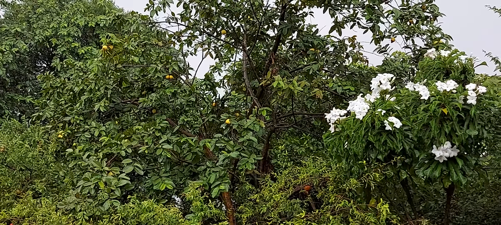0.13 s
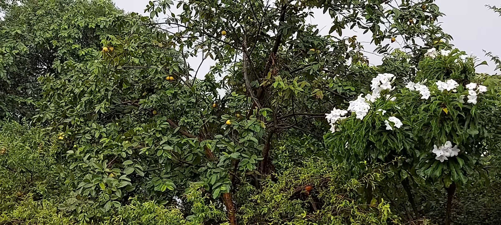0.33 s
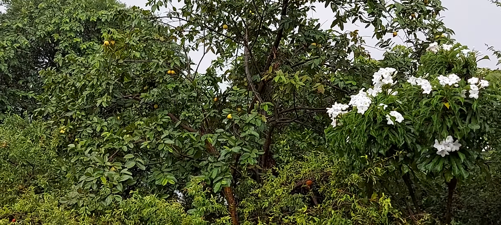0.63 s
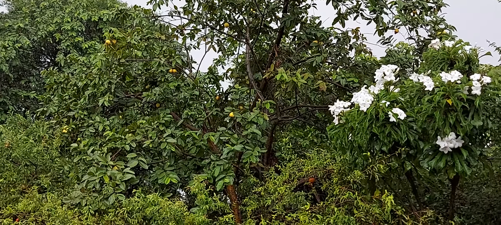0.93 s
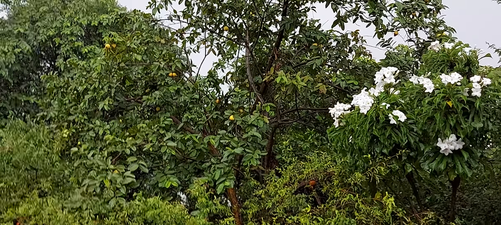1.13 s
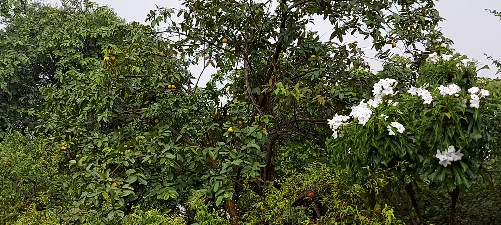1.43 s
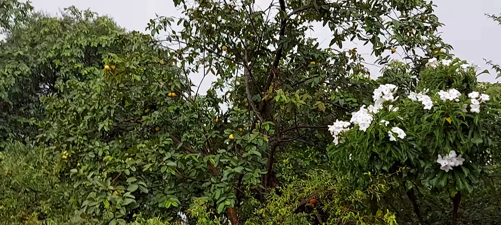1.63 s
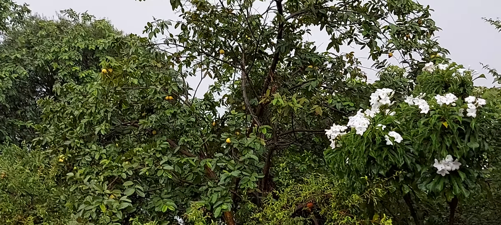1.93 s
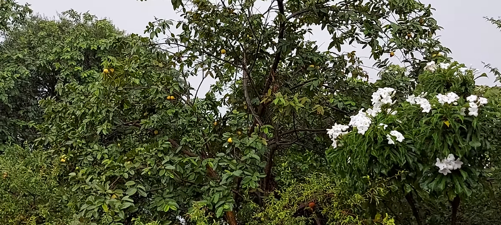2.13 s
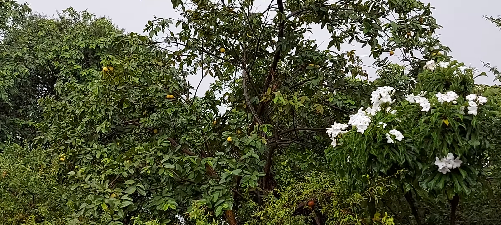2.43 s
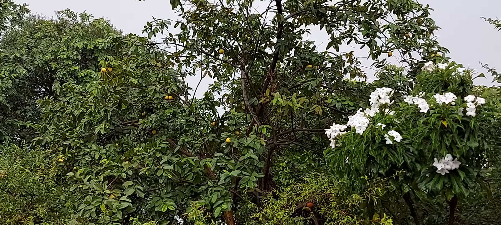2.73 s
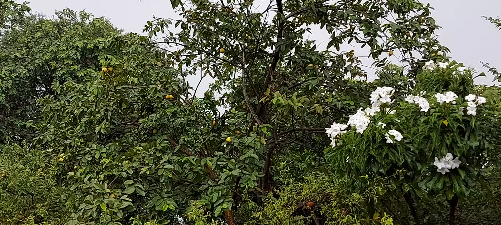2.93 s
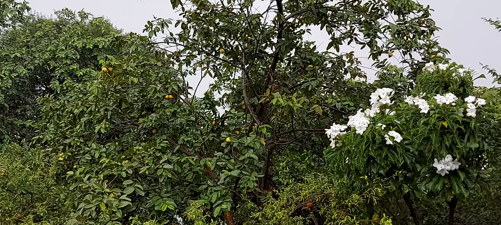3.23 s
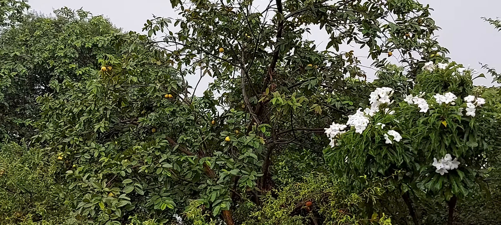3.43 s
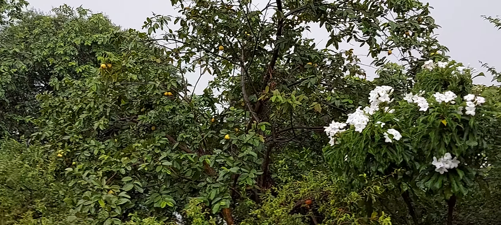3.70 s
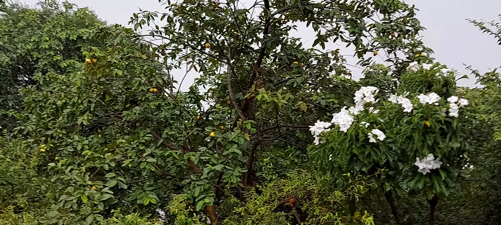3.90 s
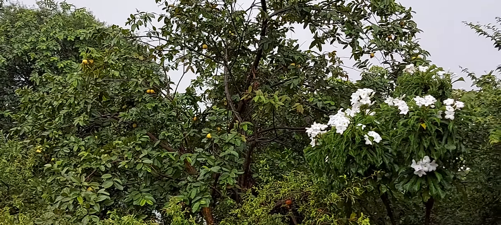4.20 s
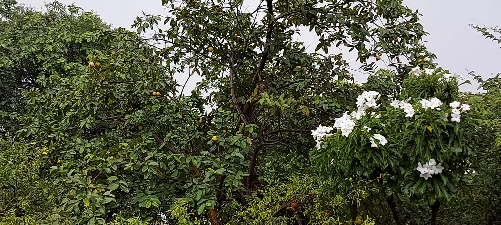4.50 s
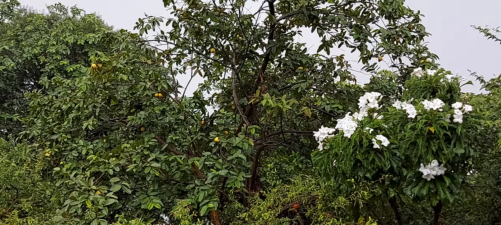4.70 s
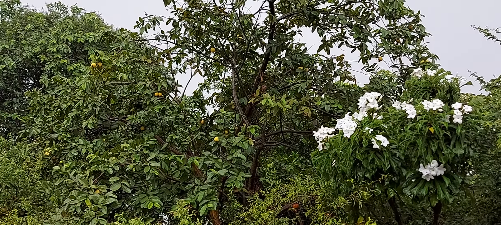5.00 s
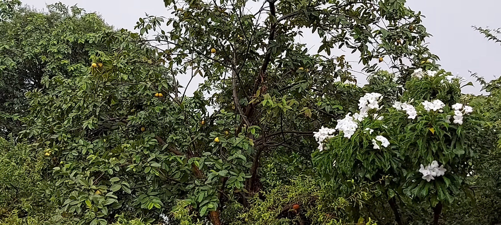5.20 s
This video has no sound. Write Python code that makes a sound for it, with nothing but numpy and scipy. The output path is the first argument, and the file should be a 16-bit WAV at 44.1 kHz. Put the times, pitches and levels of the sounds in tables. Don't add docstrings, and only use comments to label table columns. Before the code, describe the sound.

A muffled, rough-edged thunder roll opens with overlapping thumps, then subsides around three seconds and grumbles softly to the end. Wide stereo rain hiss surrounds it, recessed while the thunder is loud. Bright ticks of near drops lean slightly left, with a small cluster after four seconds. A thin distant bird and blurred insects are barely audible in the wet garden.

```python
import sys
import numpy as np
from scipy import signal
from scipy.fft import rfft, irfft, next_fast_len
from scipy.io import wavfile
from scipy.ndimage import uniform_filter1d

SR = 44100
rng = np.random.default_rng(int(sys.argv[2]) if len(sys.argv) > 2 else 0)


def unload_audio(sound):
    columns = np.transpose(np.atleast_2d(sound))
    steps = np.round(np.clip(columns, -1, 1) * 32767)
    wavfile.write(sys.argv[1], SR, steps.astype(np.int16))


def convert_level_to_amplitude(level_db):
    exponent = np.asarray(level_db, float) / 20
    return 10 ** exponent


N = 236012
TIME_S = np.arange(N) / SR
PADDED = next_fast_len(N + 8192)
HZ = np.maximum(np.arange(PADDED // 2 + 1) * SR / PADDED, 1)

# time_s, level_db
THUNDER_ROLL = [(0.0, -24.5), (0.28, -28), (0.45, -19.5), (0.75, -22), (0.95, -27), (1.5, -22),
                (1.9, -21.5), (2.35, -28), (2.9, -29.5), (3.1, -34), (3.5, -33.5), (3.9, -31.7),
                (4.35, -28.5), (4.85, -33.0), (4.97, -27.5), (5.35, -30)]
# pitch_hz, level_db (per Hz)
THUNDER_COLOUR = [(20, -32), (28, -41), (40, -12.5), (52, -1.5), (91, 2), (134, -1.5), (167, -0.5),
                  (211, -7), (358, -15), (440, -21.5), (548, -24.5), (683, -29.5), (779, -40),
                  (1100, -41.5)]
REGISTER_EDGES = (90, 220, 420)
# centre_hz, offset_db, share of the roll's swing (ratio)
THUNDER_REGISTERS = [
    (60, -7, 1.18),
    (140, -0.9, 1.19),
    (300, -5, 0.97),
    (583, -13, 0.56),
]
# middle_s, lift_db, pitch_hz, length_s
THUNDER_CLAPS = [(0.231, 9, 60, 0.11), (0.354, 13, 60, 0.081), (0.383, 8, 200, 0.032),
                 (0.514, 8, 200, 0.053), (0.613, 9.5, 185, 0.057), (0.694, 10, 60, 0.051),
                 (0.74, 15.5, 140, 0.038), (0.79, -3, 60, 0.028), (0.84, 12, 90, 0.044),
                 (0.888, 12, 140, 0.024), (0.953, 4.5, 200, 0.053), (1.01, 11, 60, 0.04),
                 (1.07, 5, 300, 0.37), (1.14, 8, 60, 0.09), (1.204, 2.5, 200, 0.032),
                 (1.3, 10.5, 89, 0.049), (1.464, 8, 60, 0.045), (1.76, 3.5, 60, 0.082),
                 (1.87, 7.5, 60, 0.045), (2.03, 4, 60, 0.09), (2.47, 4, 60, 0.04), (2.68, 6.0, 300, 0.029),
                 (2.724, 2, 60, 0.09), (2.912, 8, 200, 0.029), (3.607, 12, 60, 0.043),
                 (3.86, 6.9, 60, 0.032), (4.52, 5.5, 60, 0.27), (4.95, 11, 60, 0.06),
                 (5.086, 11, 60, 0.058), (5.278, 6.5, 60, 0.16)]
# time_s, tilt_db (per octave)
CHANNEL_NEARNESS = [(0, -0.8), (.45, 1.6), (.8, 0.3), (1.3, -0.7), (1.9, 0), (2.6, .5), (3.3, -0.3),
                    (3.9, 1), (4.6, -0.24), (5.35, .1)]
# pitch_hz, width_hz, peak_db
PORCH_RESONANCES = [(117, 10.5, 4), (168, 123, 2.5), (249, 4.9, 1.5), (309, 68, 4.5), (364.4, 4.1, 4),
                    (532, 30, 4.5), (630, 19, 2)]
# time_s, level_db
RAIN_LEVEL = [(0, -41.5), (.25, -42.5), (.51, -45), (.65, -48.5), (1.61, -49), (1.97, -48.5), (2.2, -47),
              (2.6, -47), (3.11, -46.5), (4.29, -42), (4.7, -42), (5.35, -41.5)]
# pitch_hz, level_db (per Hz)
RAIN_COLOUR = [(290, -65), (500, 2), (522, -6), (648, -8), (769, -8), (1030, -11), (1430, -9.5),
               (1650, -11.5), (1800, -11.5), (2330, -15.5), (4310, -15), (4770, -17), (7130, -20.5),
               (11600, -20.5), (15500, -28.5)]
# pitch_hz, width_hz, peak_db
HOUSING_RESONANCE = (1795, 130, 5.1)
# start_s, peak_db, centre_hz, thud_db (thud relative to peak)
NEAR_DROPS = [(0.1261, -26, 12000, -17), (0.374, -28, 11300, -18), (0.615, -37, 9720, -16),
              (0.83, -39, 11300, -16), (0.9792, -39, 10100, -13), (1.1802, -39, 8070, -14),
              (1.2321, -37, 11200, -17), (1.7629, -37, 9260, -17), (1.9684, -40, 8730, -13),
              (2.0752, -33, 9190, -18), (2.1316, -32, 11000, -16), (2.2154, -36, 11500, -15),
              (2.2324, -36, 8690, -15), (2.2702, -24, 13500, -27), (2.5122, -33, 8920, -20),
              (2.5534, -37, 8810, -17), (2.5654, -37, 13000, -15), (2.9193, -36, 11700, -17),
              (3.2284, -39, 11300, -13), (3.3184, -33, 11100, -17), (3.5144, -34, 9890, -15),
              (3.6584, -37, 9580, -12), (4.2084, -34, 8680, -15), (4.2976, -22, 9980, -20),
              (4.3196, -27, 10500, -20), (4.3425, -28, 10600, -20), (4.6784, -36, 11500, -11),
              (4.9302, -32, 11100, -16), (5.1332, -25, 10500, -11), (5.2384, -34, 9390, -13)]
# time_s, pitch_hz, level_db
BIRD_WHISTLES = [
    [(.8, 3830, -64), (.825, 3820, -60), (.85, 3765, -57), (.885, 3750, -55), (.925, 3720, -61),
     (.95, 3630, -54), (.98, 3480, -58), (1.0, 3400, -64), (1.05, 3330, -69)],
    [(4.985, 3620, -66), (4.997, 3600, -55), (5.02, 3580, -55), (5.038, 3550, -49), (5.05, 3520, -64),
     (5.13, 3620, -62), (5.16, 3580, -70)],
]
# pitch_hz, width_hz, level_db
INSECT_CHORUS = (1800, 75, -59)
# pitch_hz, difference_db
MICROPHONE_SHADING = [(60, 3), (92, 0), (140, 1), (210, 0.5), (330, 0), (500, 1.5), (770, 1), (1170, 4),
                      (1790, 4.5), (2740, -2.5), (4190, 1), (6410, -4.5), (9810, 5), (15000, 4)]

MICROPHONE_SPACING_M = 0.17
ROLL_MEAN_DB = -25


def rms_one(x):
    return x / np.sqrt(np.mean(x ** 2) + 1e-20)


def in_time(rows):
    s, *columns = np.transpose(rows)
    return [np.interp(TIME_S, s, column) for column in columns]


def at_hz(points):
    hz, db = np.transpose(points)
    return np.interp(np.log(HZ), np.log(hz), db)


def peaks_db(modes):
    return sum(peak_db / (1 + (2 * (HZ - hz) / width_hz) ** 2) for hz, width_hz, peak_db in modes)


def below(hz):
    return 1 / (1 + (HZ / hz) ** 8)


def drift(rate_hz):
    r = np.exp(-2 * np.pi * rate_hz * 40 / SR)
    noise = rng.standard_normal(N // 40 + 2002)
    slow = signal.lfilter([1], [1, -2 * r, r * r], noise)[2000:]
    return np.interp(np.arange(N) / 40, np.arange(len(slow)), rms_one(slow))


def grains(per_s, spread_db, shape):
    born = rng.random(shape) < per_s / SR
    size_db = spread_db * np.minimum(rng.exponential(1, shape), 5)
    return rms_one(born * convert_level_to_amplitude(size_db) * rng.choice([-1, 1], shape))


def all_around(pair):
    angles = np.linspace(0, np.pi / 2, 24)[:, None]
    delay_s = MICROPHONE_SPACING_M / 343 * np.cos(angles)
    alike = np.mean(np.cos(2 * np.pi * HZ * delay_s), axis=0) / (1 + (HZ / 2500) ** 2)
    mid, side = rfft(pair, PADDED)
    shared = np.sqrt(1 + alike) * mid
    different = np.sqrt(1 - alike) * side
    return np.array([shared + different, shared - different]) / np.sqrt(2)


def evened(x, span_s):
    span = int(span_s * SR)
    power = uniform_filter1d(np.mean(x ** 2, axis=0), size=span)
    return x / np.sqrt(uniform_filter1d(power, size=span))


def claps_db(centre_hz):
    s, lift_db, hz, length_s = np.transpose(THUNDER_CLAPS)[:, :, None]
    t = np.arange(0, N + 64, 64) / SR
    reach_octaves = 0.82
    near = np.exp(-(np.log2(centre_hz / hz) / reach_octaves) ** 2)
    swell = np.exp(-4 * np.log(2) * ((t - s) / length_s) ** 2)
    return np.interp(TIME_S, t, np.sum(lift_db * near * swell, axis=0))


def thunder(flutter_db):
    (roll_db,), (tilt_db,) = in_time(THUNDER_ROLL), in_time(CHANNEL_NEARNESS)
    lag_s, scattered = 0.00028, 0.35
    lag = np.exp(-2j * np.pi * HZ * lag_s * np.array([[0], [1]]))
    direct = rfft(grains(2500, 2.5, N), PADDED) * lag
    off_the_land = all_around(rng.standard_normal((2, N)))
    waves = np.sqrt(1 - scattered) * direct + np.sqrt(scattered) * off_the_land
    waves = waves * convert_level_to_amplitude(at_hz(THUNDER_COLOUR) + peaks_db(PORCH_RESONANCES)) * below(1110)

    under = [0] + [below(hz) for hz in REGISTER_EDGES] + [1]
    out, shared_flutter = 0, drift(13.0)
    for low, high, (hz, offset_db, follows) in zip(under, under[1:], THUNDER_REGISTERS):
        band = evened(irfft(waves * (high - low), PADDED)[:, :N], span_s=0.061)
        level_db = ROLL_MEAN_DB + offset_db + follows * (roll_db - ROLL_MEAN_DB)
        level_db = level_db + claps_db(hz) + tilt_db * np.log2(hz / 140)
        flutter = flutter_db * (shared_flutter + 0.91 * drift(21))
        out = out + band * convert_level_to_amplitude(level_db + flutter)
    return out


def rain(patter_db, patchy_db):
    rain_db, = in_time(RAIN_LEVEL)
    bright_db = -50.5 + 1.05 * (rain_db - rain_db.mean())
    colour = convert_level_to_amplitude(at_hz(RAIN_COLOUR) + peaks_db([HOUSING_RESONANCE])) * (1 - below(433))
    treble = 1 - 1 / (1 + (HZ / 7000) ** 2)
    patter = all_around(grains(900, 4.9, (2, N))) * convert_level_to_amplitude(patter_db) * treble
    hiss = all_around(rng.standard_normal((2, N)))
    waves = (hiss + patter) * colour
    dull = rms_one(irfft(waves * below(5200), PADDED)[:, :N])
    bright = rms_one(irfft(waves * (1 - below(5570)), PADDED)[:, :N])
    dull = dull * convert_level_to_amplitude(rain_db + 4.0 + patchy_db * drift(5.3))
    return dull + bright * convert_level_to_amplitude(bright_db + 3.0 + patchy_db * drift(15))


def band_filter(x, order, hz, kind):
    return signal.sosfilt(signal.butter(order, hz, kind, fs=SR, output="sos"), x)


def drops(snap_s, splash_s, splash_db, lag_s):
    length = 4096
    out, t = np.zeros((2, N + length)), np.arange(length) / SR
    snap_delay_s = 0.0007
    pan_db = 5 / 2 * np.array([[1], [-1]])
    for s, peak_db, hz, thud_db in NEAR_DROPS:
        noise = rng.standard_normal((3, length))
        snap = (t == 0) * 2.6 + noise[0] * np.exp(-t / snap_s)
        splash = convert_level_to_amplitude(splash_db) * noise[1:] * np.exp(-t / splash_s)
        burst = np.array([snap, np.roll(snap, int(lag_s * SR))]) + splash
        bright = band_filter(burst, 1, [0.69 * hz, min(1.23 * hz, 16000)], "band")
        bright = band_filter(bright, 2, 7500, "high")
        thud = band_filter(burst, 2, [5000, 7200], "band")
        hit = bright / np.max(np.abs(bright.mean(axis=0)))
        hit = hit + convert_level_to_amplitude(thud_db + 15.0) * thud / np.max(np.abs(thud))
        start = round((s + snap_delay_s) * SR)
        out[:, start:start + length] += hit * convert_level_to_amplitude(peak_db + 0.5 + pan_db)
    return out[:, :N]


def bird(waver_db, echo_db):
    out = 0
    for rows in BIRD_WHISTLES:
        hz, level_db = in_time(rows)
        sounding = (TIME_S > rows[0][0]) & (TIME_S < rows[-1][0])
        level = convert_level_to_amplitude(level_db + 4 + waver_db * drift(40))
        unsteady_hz = hz + 20 * drift(50)
        out = out + sounding * level * np.sin(2 * np.pi * np.cumsum(unsteady_hz) / SR)
    echoes = rng.standard_normal((2, 4410)) * np.exp(-np.arange(4410) / SR / 0.03)
    return out + convert_level_to_amplitude(echo_db) * signal.fftconvolve(out[None], echoes, axes=1)[:, :N]


def insects(flicker_db):
    hz, width_hz, level_db = INSECT_CHORUS
    hump = 1 / (1 + (2 * (HZ - hz) / width_hz) ** 2)
    band = irfft(rfft(rng.standard_normal((2, N)), PADDED) * hump, PADDED)[:, :N]
    rain_db, = in_time(RAIN_LEVEL)
    return rms_one(band) * convert_level_to_amplitude(level_db + rain_db - rain_db.mean() + flicker_db * drift(14))


def scene():
    far = rfft(thunder(flutter_db=0.69) + rain(patter_db=-8, patchy_db=0.4), PADDED)
    far = far * convert_level_to_amplitude(at_hz(MICROPHONE_SHADING) / 2 * np.array([[1], [-1]]))
    far = irfft(far, PADDED)[:, :N]
    near = drops(snap_s=0.0005, splash_s=0.010, splash_db=-17, lag_s=0.0003)
    return far + near + bird(waver_db=1.5, echo_db=-36) + insects(flicker_db=3.5)


def band_limit(x):
    return signal.sosfilt(signal.butter(12, 16510, fs=SR, output="sos"), x)


def record(dry):
    steep_cut = 1 / (1 + (HZ / 15800) ** 400)
    mix = irfft(rfft(dry, PADDED) * steep_cut, PADDED)[:, :N]
    return band_limit(mix)


dry = scene()
out = record(dry)
unload_audio(out)
```